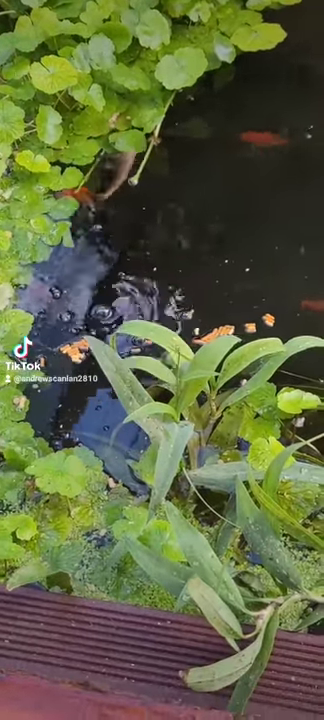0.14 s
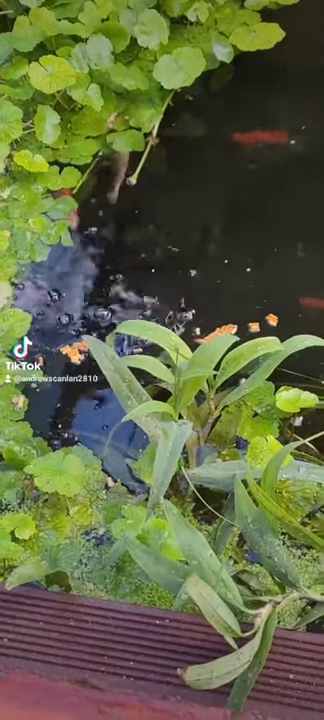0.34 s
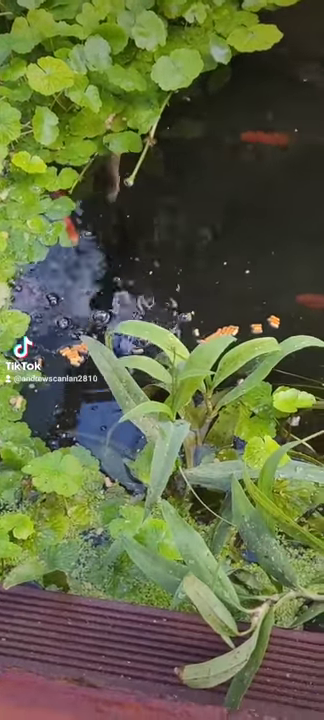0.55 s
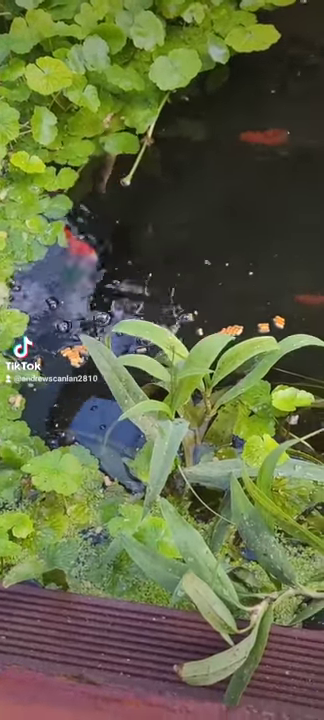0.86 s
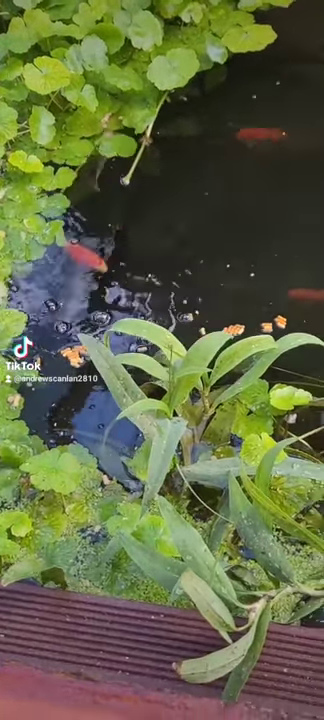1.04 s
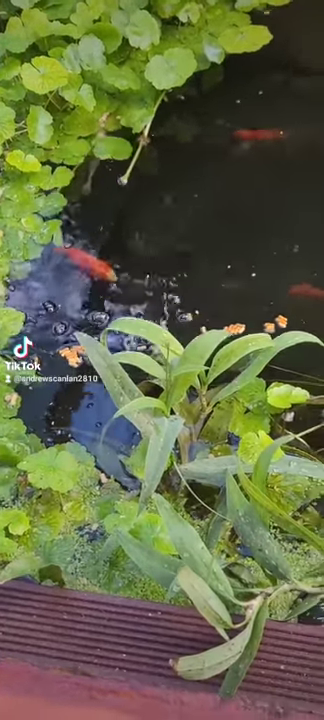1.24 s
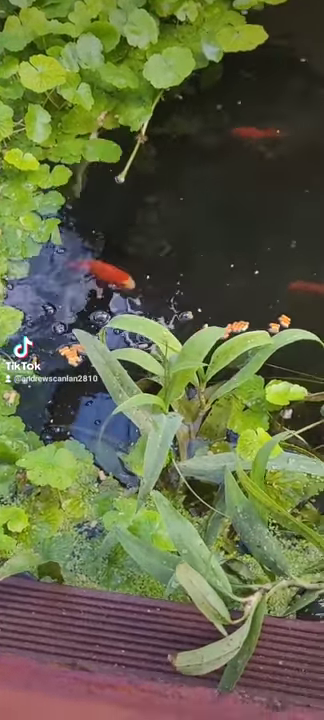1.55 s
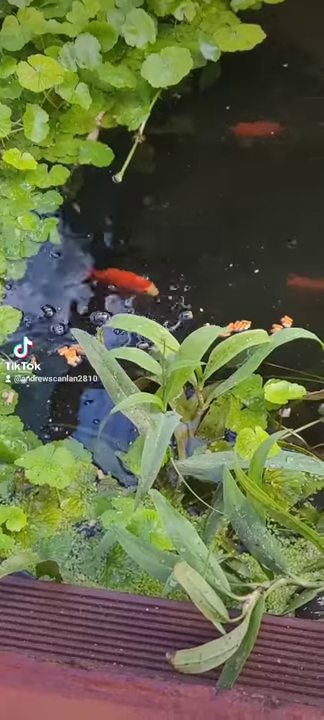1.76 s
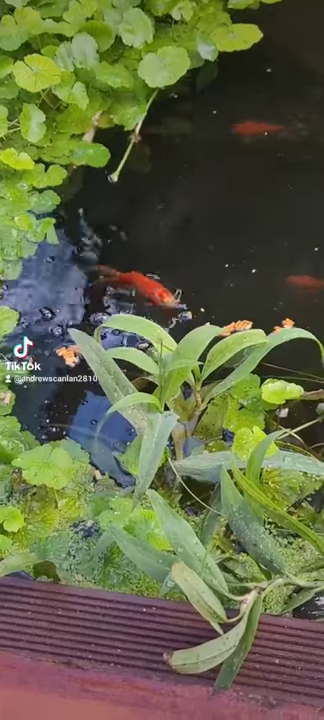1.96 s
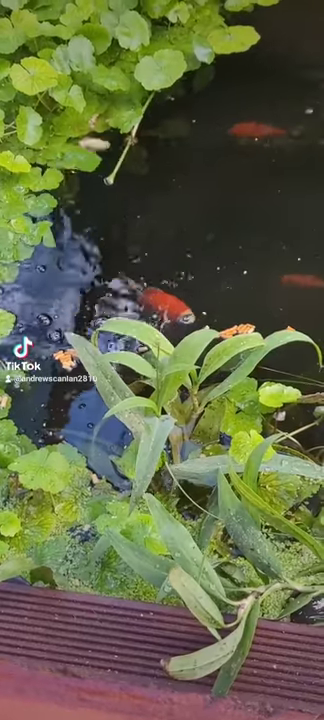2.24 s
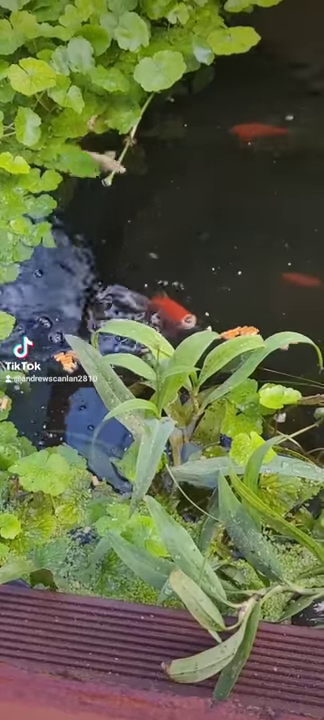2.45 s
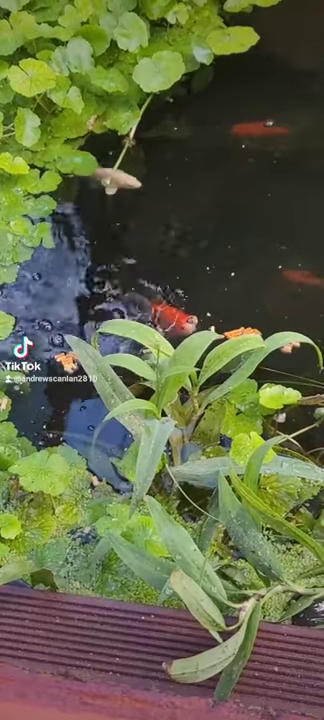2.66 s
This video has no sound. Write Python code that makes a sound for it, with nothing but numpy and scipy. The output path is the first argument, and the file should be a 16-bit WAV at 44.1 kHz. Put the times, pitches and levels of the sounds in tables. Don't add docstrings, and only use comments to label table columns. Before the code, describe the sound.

Water trickles steadily into a garden pond, with quick drips, plinks and soft low glugs over a constant pump hum; outdoors, close stereo microphone, a wind bump midway and heavy buffeting near the end, mostly right.

```python
import sys
import numpy as np
from scipy import signal
from scipy.io import wavfile
from scipy.ndimage import uniform_filter1d

SR = 44100
rng = np.random.default_rng(int(sys.argv[2]) if len(sys.argv) > 2 else 0)


def to_linear_factor(level_db):
    exponent = np.asarray(level_db, float) / 20
    return 10 ** exponent


def transcribe(signal):
    frames = np.atleast_2d(signal).T
    limited = np.clip(frames, -1, 1)
    pcm = np.round(limited * 32767).astype(np.int16)
    wavfile.write(sys.argv[1], SR, pcm)


N = 123480
T = np.arange(N) / SR
LEFT_MINUS_RIGHT = np.array([[1], [-1]])
BREEZE_LEFT_DB = -11
DRIP_RISE = 0.06


def rms_one(x):
    return x / np.sqrt(np.mean(x ** 2) + 1e-20)


def at_hz(points, hz):
    table_hz, value = np.transpose(points)
    return np.interp(np.log(hz), np.log(table_hz), value)


def band(x, low_hz, high_hz):
    limits = [low_hz, min(high_hz, .45 * SR)]
    return signal.sosfilt(signal.butter(2, limits, "band", fs=SR, output="sos"), x)


def drift(rate):
    r = np.exp(-80 * np.pi * rate / SR)
    noise = rng.standard_normal(N // 40 + 2002)
    slow = signal.lfilter([1], [1, -2 * r, r * r], noise)[2000:]
    return np.interp(np.arange(N) / 40, np.arange(len(slow)), rms_one(slow - slow.mean()))


def pan(db):
    return to_linear_factor(np.array([[db / 2], [-db / 2]]))


def add(out, s, sound):
    i = int(s * SR)
    out[:, i:i + sound.shape[-1]] += sound[..., :max(N - i, 0)]


def bed(spectrum, edges, patchy_db, shared_db):
    # (frequency [Hz], likeness [0-1])
    likeness = [(60, 0.71), (200, .995), (400, 0.81), (640, 0.74), (1400, 0.42), (3070, 0.2), (6730, 0.046),
                (14800, 0.032)]
    # (frequency [Hz], left-right level [dB])
    lean = [(60, -2), (380, -0.5), (1280, -2), (4350, 0), (8020, 3), (14800, 7.5)]
    steady_above_hz = 6000
    out, together = 0, drift(19.0)
    white = rng.standard_normal((2, 2, N))
    for k, (low, high) in enumerate(zip(edges, edges[1:])):
        mid, side = band(white[k % 2], low, high)
        hz = np.sqrt(low * high)
        alike = np.clip(at_hz(likeness, hz), 0, 1)
        flicker = patchy_db * min(steady_above_hz / hz, 1) * drift(10.6)
        gain = to_linear_factor(at_hz(spectrum, hz) + shared_db * together + flicker) * pan(at_hz(lean, hz))
        out = out + gain * (np.sqrt(1 + alike) * mid + np.sqrt(1 - alike) * side * LEFT_MINUS_RIGHT)
    return rms_one(out)


def bubble(hz, length, rise):
    t = np.arange(int(2 * length * SR) + 8) / SR
    tone = np.sin(2 * np.pi * hz * (t + rise * t ** 2 / (2 * length)))
    return tone * (1 - np.exp(-t * hz / 2)) * to_linear_factor(-25 * t / length)


def burst(hz, width, length):
    noise = rng.standard_normal((3, SR // 4))
    t = np.arange(SR // 4) / SR
    shape = np.minimum(t / .002, 1) / (1 + (t / length) ** 3)
    partly_shared = 0.63 * noise[0] + noise[1:]
    return shape * rms_one(band(partly_shared, hz * (1 - width), hz * (1 + width)))


def pump():
    orders = [2, 4, 6, 18, 19, 20, 21, 25, 27, 31, 32]
    # (peak level [dB], left-right level [dB], left lead [rad])
    hum = [(-33, 0, 0), (-52.5, 0, 0), (-65, -1, -.2), (-68, 3, -.1), (-61, 3, .45), (-46.5, -2, 0),
           (-72, 3, 0), (-71, 2, .8), (-74, 0, .1), (-69, -14, 2.3), (-72, -10, 1.8)]
    mains_hz, wobble_db, weak_waver = 50.003, .4, 5.0
    duck_from_s, duck_to_s, duck_db = 2.5, 2.71, -4
    right_sink_s, right_sink_db = 1.7, -3.2
    duck = duck_db * uniform_filter1d(1. * ((T > duck_from_s) & (T < duck_to_s)), size=600)
    sink = np.array([[-right_sink_db / 4], [right_sink_db * 3 / 4]])
    duck = duck + sink / (1 + np.exp((right_sink_s - T) / 0.071))
    out = 0
    for k, (db, lean_db, lead) in zip(orders, hum):
        waver = wobble_db * weak_waver
        if k in (2, 20):
            waver = wobble_db
        elif k == 4:
            waver = wobble_db * weak_waver / 2
        phase = 2 * np.pi * (k * mains_hz * T + rng.random())
        phase = phase + np.array([[lead], [0]]) + 0.12 * waver * drift(3.9)
        level = to_linear_factor(db + waver * drift(12.0) + duck * (k == 2))
        out = out + level * pan(lean_db) * np.cos(phase)
    return out


def garden_air():
    # (frequency [Hz], level per Hz [dB])
    air_spectrum = [(28, -31), (55, -1.5), (90, -11), (140, -14.5), (280, -13), (450, -21.5), (900, -21),
                    (1700, -29.5)]
    return to_linear_factor(-46) * bed(air_spectrum, np.geomspace(28, 1700, num=15), patchy_db=1.08, shared_db=-0.95)


def trickle():
    # (frequency [Hz], level per Hz [dB])
    water_spectrum = [(1000, -31), (1700, -3.5), (3260, -7), (4100, -6.5), (4930, -7), (7590, -11),
                      (8950, -14.5), (11800, -11), (15200, -14.5)]
    return to_linear_factor(-57) * bed(water_spectrum, np.geomspace(1700, 16500, num=11), patchy_db=2.0, shared_db=1.07)


def fizz():
    per_s, level_db, low_hz, high_hz, cycles = 200, -73, 1478, 6700, 19.4
    out, draws = np.zeros((2, N)), rng.random((900, 4))
    times = np.cumsum(-np.log(draws[:, 0])) / per_s
    for s, (_, p, size, place) in zip(times, draws):
        hz = low_hz * (high_hz / low_hz) ** p
        if s < N / SR:
            level = to_linear_factor(level_db - 5.6 * np.log(size + 0.042))
            add(out, s, level * pan(6 * place - 3) * bubble(hz, cycles / hz, rise=0.094))
    return out


def plinks():
    # (time [s], peak level [dB], pitch [Hz])
    pops = [(.01, -49, 1850), (.323, -49, 2070), (.405, -56, 2250), (.46, -51, 1620), (1.06, -58, 5250),
            (1.126, -48, 1970), (1.198, -49, 790), (1.2, -54, 615), (1.3, -55, 600), (1.72, -55, 620),
            (1.8, -55, 2000), (2.5, -58, 2550), (2.62, -56, 4300), (2.635, -60, 3850)]
    out = np.zeros((2, N))
    for s, db, hz in pops:
        length = .014 + 18 / hz
        add(out, s, to_linear_factor(db) * bubble(hz, length, DRIP_RISE)[None])
    return out


def drips():
    # (time [s], peak level [dB], pitch [Hz], length [s], pitch spread [share])
    falls = [(0.086, -46, 3710, 0.021, 0.17), (0.152, -48.5, 3850, 0.016, 0.14),
             (0.198, -53, 4070, .025, .2), (0.303, -56, 2780, .03, .15), (0.355, -53, 3910, .025, .05),
             (0.463, -50.5, 3850, 0.03, .05), (0.489, -51, 4030, 0.026, 0.056),
             (0.676, -53, 3270, 0.02, 0.036), (0.7, -49, 2230, .016, .06), (.835, -60, 5800, .015, 0.056),
             (0.911, -51.5, 3760, 0.021, .04), (.93, -58, 4050, 0.025, .05), (1.05, -55, 3430, 0.014, 0.14),
             (1.154, -48.5, 4160, .045, 0.13), (1.281, -47.5, 5400, .02, 0.11),
             (1.283, -56, 3900, 0.016, .06), (1.328, -53, 3330, .025, 0.19), (1.373, -56, 5340, .06, 0.137),
             (1.495, -48, 3710, 0.019, .17), (1.545, -43.5, 2280, .011, 0.14),
             (1.561, -46, 2090, 0.024, 0.22), (1.677, -48, 3720, .014, 0.093),
             (1.704, -52, 4480, 0.037, 0.046), (1.71, -55, 5440, .04, .05), (1.741, -53, 3570, .02, .15),
             (1.844, -55.5, 6000, .02, .06), (1.86, -52, 2160, 0.017, 0.1),
             (1.919, -51, 4030, 0.016, 0.066), (2.052, -55, 5800, .012, 0.058),
             (2.068, -61, 5700, .025, .06), (2.144, -53, 3940, .018, .04),
             (2.149, -46.5, 1990, 0.018, 0.13), (2.186, -58, 3750, .022, .04), (2.19, -53, 1900, .04, .1),
             (2.353, -48.5, 3180, .01, 0.3), (2.372, -46, 2730, .016, 0.2),
             (2.673, -49, 5070, 0.018, 0.055), (2.742, -47, 2030, .018, 0.025),
             (2.753, -49, 2780, .01, .05), (2.768, -50.5, 5200, .015, 0.047)]
    spatter_db, tone, ring_s = -8.5, 0.43, .016
    out = np.zeros((2, N))
    for (s, db, hz, length, spread), draws in zip(falls, rng.random((len(falls), 6, 3))):
        add(out, s, to_linear_factor(db + spatter_db) * burst(hz, spread, 1.36 * length))
        for k, (late, off, place) in enumerate(draws):
            slot = ((3 * k + 3) % 7 + off) / 7
            ring = bubble(hz * (1 + spread * (2 * slot - 1)), ring_s, DRIP_RISE)
            start = s + late * length * (k > 0)
            add(out, start, to_linear_factor(db - k) * tone * pan(8 * place - 4) * ring)
    return out


def splats():
    # (time [s], level [dB], centre frequency [Hz], width [share], length [s])
    hits = [(0.091, -55, 7500, 0.89, 0.011), (0.194, -57.5, 11000, 0.088, 0.037),
            (0.206, -57.5, 6000, 0.62, 0.027), (0.499, -63, 13000, .15, .07),
            (0.702, -54, 10400, 0.71, 0.024), (1.279, -54.5, 8500, 1, 0.022),
            (1.334, -59, 4000, 0.48, 0.11), (1.501, -64.5, 11300, 0.27, 0.078),
            (1.56, -57.5, 7450, 0.52, 0.05), (1.954, -54.5, 5040, 0.47, 0.011),
            (2.189, -57, 10700, 0.21, 0.032), (2.19, -56, 3430, 0.47, 0.028),
            (2.419, -55, 4850, 0.78, 0.031), (2.481, -57, 6250, 0.78, 0.035)]
    out = np.zeros((2, N))
    for s, db, hz, width, length in hits:
        add(out, s, to_linear_factor(db) * pan(3.5) * burst(hz, np.clip(width, .05, .8), length))
    return out


def glugs():
    # (time [s], level [dB], start pitch [Hz], length [s])
    big_bubbles = [
        (0.266, -64, 228, 0.09),
        (0.449, -50, 270.6, 0.14),
        (.885, -52, 215.7, 0.11),
        (0.907, -69, 321, 0.068),
        (1.236, -54.5, 282, 0.13),
        (1.489, -56, 246, 0.083),
        (1.632, -53, 260, 0.051),
        (2.167, -51.5, 198.4, 0.079),
        (2.286, -57, 244, .12),
        (2.728, -63, 304, 0.073),
    ]
    rise = 0.349
    out = np.zeros((2, N))
    for s, db, hz, length in big_bubbles:
        t = np.arange(int(length * SR)) / SR
        swell = np.sqrt(np.sin(np.pi * t / length))
        tone = np.sin(2 * np.pi * hz * (t + rise * t ** 2 / (2 * length)))
        add(out, s, to_linear_factor(db) * swell * tone[None])
    return out


def first_puff():
    time_s, length_s, level_db = 0.818, 0.041, -60
    shape = np.exp(-((T - time_s) / length_s) ** 4)
    puff = to_linear_factor(level_db) * shape * rms_one(band(rng.standard_normal(N), 50, 120))
    return puff * LEFT_MINUS_RIGHT


def eddies():
    # (time [s], peak level [dB], pitch [Hz], length [s])
    whirls = [
        (1.04, -44, 195, .035),
        (1.258, -35, 55, .02),
        (1.3, -35, 60, .018),
        (1.357, -33, 65, .015),
        (1.424, -29, 58, .022),
        (1.459, -32, 80, .012),
        (1.489, -31, 75, .016),
        (1.539, -30, 62, .016),
        (1.588, -23, 62, .028),
        (1.637, -24.5, 60, .02),
    ]
    out = np.zeros((2, N))
    for s, db, hz, length in whirls:
        level = to_linear_factor(db + np.array([[BREEZE_LEFT_DB - 7.0], [0]]))
        out -= level * np.cos(2 * np.pi * hz * (T - s)) * np.exp(-((T - s) / length) ** 2)
    return out


def breeze():
    # (time [s], level [dB])
    strength = [(1.18, -75), (1.27, -45), (1.33, -47), (1.45, -46), (1.6, -45), (1.68, -41), (1.78, -65),
                (1.93, -38.5), (2.05, -62), (2.25, -49), (2.46, -46), (2.53, -44), (2.68, -45),
                (2.73, -47.5)]
    low_hz, cut_hz, calm_db = 39.7, 77, -54
    s, db = np.transpose(strength)
    gust = np.sqrt(np.maximum(to_linear_factor(np.interp(T, s, db)) ** 2 - to_linear_factor(calm_db) ** 2, 0))
    noise = rng.standard_normal((2, N)) * to_linear_factor(3.0 * drift(5.5))
    rumble = band(noise, low_hz, cut_hz)
    rumble = rumble / np.sqrt(abs(uniform_filter1d(rumble ** 2, size=2600)) + 1e-9)
    return gust * to_linear_factor(np.array([[BREEZE_LEFT_DB], [4.0]])) * rumble


def buffets():
    # (time [s], right height [full scale], left height [full scale], pitch [Hz])
    swings = [(2.4895, -.36, -.18, 130), (2.494, .07, .09, 170), (2.498, .09, 0, 55), (2.5005, .12, 0, 120),
              (2.5068, -.22, -.02, 62), (2.519, .04, -.05, 85), (2.5335, .13, 0, 105),
              (2.5396, .16, 0, 200), (2.545, -.09, 0, 110), (2.5505, .11, 0, 215), (2.565, .11, -.02, 85),
              (2.579, .05, 0, 200), (2.587, -.12, 0, 80), (2.5925, .09, -.02, 105), (2.598, .04, 0, 240),
              (2.604, -.03, .04, 90), (2.619, -.09, -.02, 134), (2.625, .04, 0, 70), (2.64, -.035, 0, 80),
              (2.653, .07, .02, 166), (2.661, .2, .04, 135), (2.682, -.11, 0, 75), (2.693, .1, -.03, 68),
              (2.7, -.04, 0, 70), (2.778, -.02, 0, 100), (2.794, .025, 0, 70)]
    cycles, edge = 0.37, 1.3
    out = np.zeros((2, N))
    for s, right, left, hz in swings:
        u = (T - s) * hz
        out += np.array([[left], [right]]) * np.cos(2 * np.pi * u) * np.exp(-abs(u / cycles) ** edge)
    return out


def wind():
    port = signal.butter(2, 600, fs=SR, output="sos")
    return signal.sosfiltfilt(port, eddies() + breeze() + buffets())


def scene():
    water = trickle() + fizz() + plinks() + drips() + splats() + glugs()
    return pump() + garden_air() + water + wind()


def roll_off(x):
    return signal.sosfilt(signal.butter(12, 15390, fs=SR, output="sos"), x)


def record(dry):
    mono_bass_hz, mono_until_s = 190, 1.21
    side = (dry[0] - dry[1]) / 2
    low_pass = signal.butter(4, mono_bass_hz, fs=SR, output="sos")
    side_bass = signal.sosfiltfilt(low_pass, side) * np.clip((mono_until_s - T) / .02, 0, 1)
    mix = dry - side_bass * LEFT_MINUS_RIGHT + first_puff()
    return roll_off(mix)


dry = scene()
out = record(dry)
transcribe(out)
```